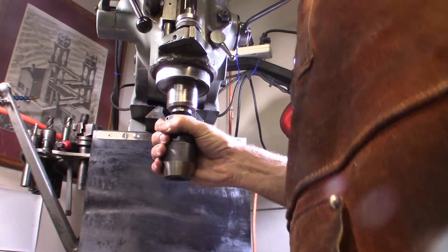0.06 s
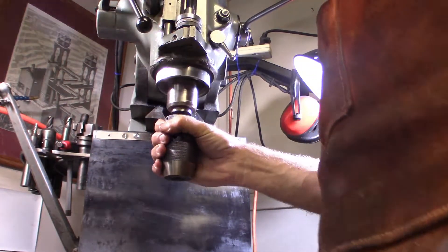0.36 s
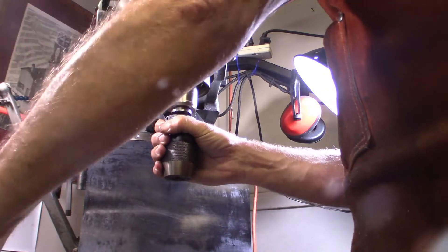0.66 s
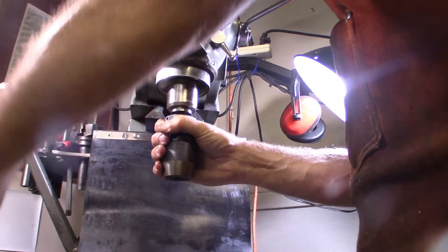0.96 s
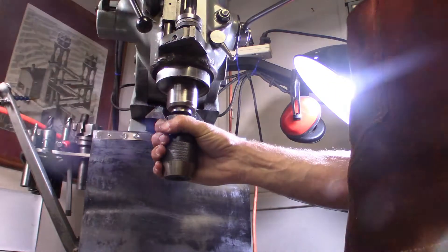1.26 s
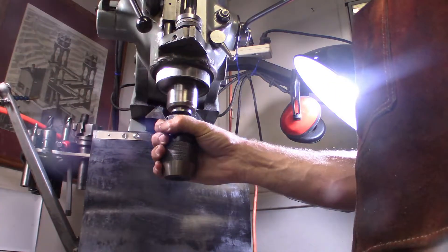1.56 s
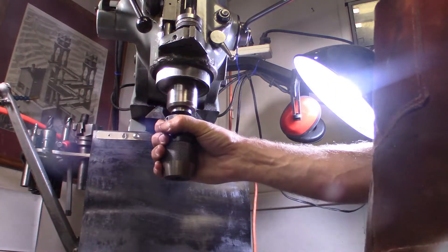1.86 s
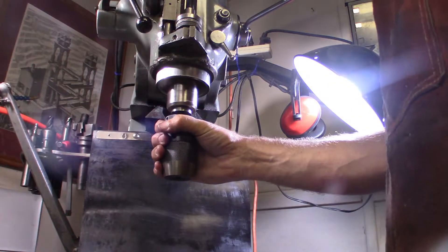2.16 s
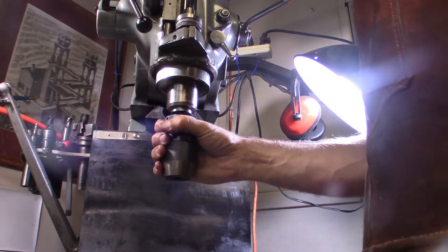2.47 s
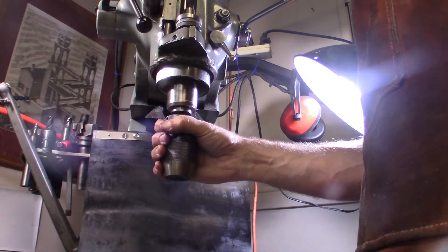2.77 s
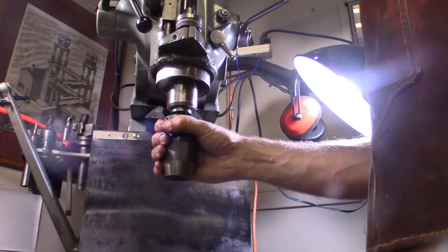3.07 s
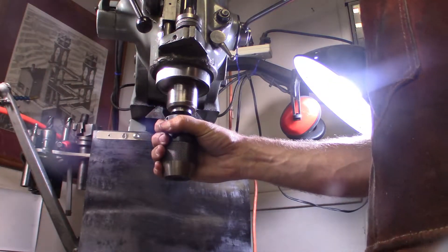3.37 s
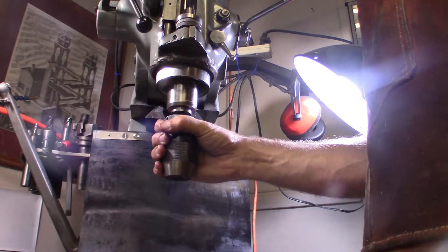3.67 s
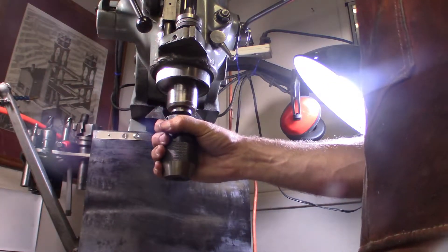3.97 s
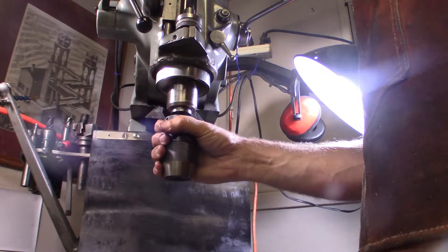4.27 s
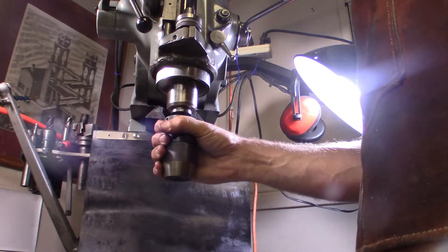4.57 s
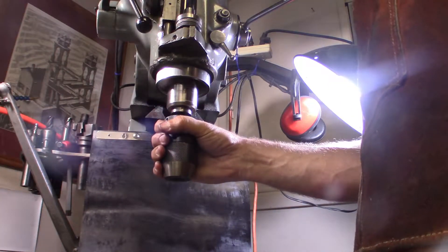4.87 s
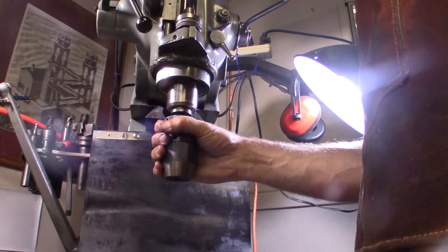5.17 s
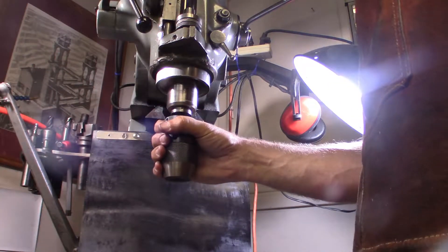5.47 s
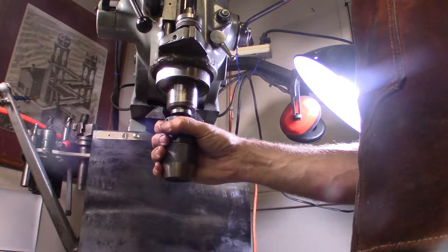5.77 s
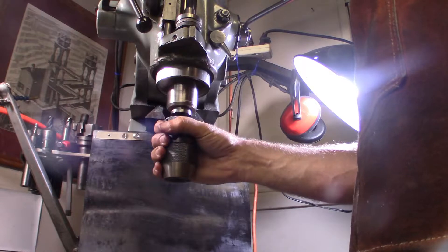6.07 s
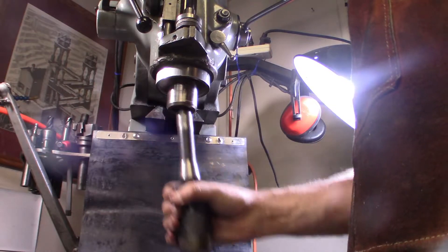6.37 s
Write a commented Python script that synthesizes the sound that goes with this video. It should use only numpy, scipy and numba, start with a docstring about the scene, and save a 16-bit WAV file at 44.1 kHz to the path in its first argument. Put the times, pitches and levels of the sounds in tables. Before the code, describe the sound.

Nine sharp, ringing hammer blows on a milling machine's steel drawbar in a small workshop, then the loosened chuck shank clinks.

```python
"""A small, hard-walled workshop: a drill chuck is knocked loose from a milling machine spindle.
Over low rumble, handling knocks and slides; a hollow tool is picked up with a bump and a scrape.
Nine hammer blows on the drawbar ring the machine head, with a faint squeak before the eighth.
The freed shank clinks against the bore. Gain control flattens every blow into the room's tail."""
import sys
import numpy as np
from scipy import signal
from scipy.fft import rfft, irfft
from scipy.io import wavfile
from scipy.ndimage import uniform_filter1d, minimum_filter1d
from numba import njit

SR = 44100
rng = np.random.default_rng(int(sys.argv[2]) if len(sys.argv) > 2 else 0)


def put_to_file(sound):
    """Save the sound as 16-bit audio at rate SR, in the file named by the first command-line argument."""
    columns = np.atleast_2d(sound).T  # one column per channel
    safe = np.clip(columns, -1, 1)
    whole_steps = np.round(safe * 32767)
    wavfile.write(sys.argv[1], SR, whole_steps.astype(np.int16))


N = 287973
T = np.arange(N) / SR
RING_T = T[:SR]  # 1 s axis for one impact


def undb(db):
    """Decibels to gain."""
    return 10 ** (np.asarray(db) / 20)


def lookup(points, hz):
    """Interpolate (f/Hz, value) points over log frequency."""
    f, value = np.transpose(points)
    return np.interp(np.log(hz), np.log(f), value)


def unit(x):
    """Scale to rms 1."""
    return x / np.std(x)


def add(out, start_s, x):
    """Mix x into out at start_s."""
    i = int(start_s * SR)
    out[i:i + len(x)] += x[:N - i]


def colour(x, db_at, size=4096):
    """Minimum-phase filter with gain db_at(hz)."""
    hz = np.maximum(np.arange(size // 2 + 1) * SR / size, 1)
    cepstrum = irfft(np.log(undb(db_at(hz))))
    cepstrum[1:size // 2] *= 2
    cepstrum[size // 2 + 1:] = 0
    impulse_response = irfft(np.exp(rfft(cepstrum)))
    return signal.fftconvolve(x, impulse_response)[:len(x)]


def band(x, hz, width_hz):
    """One resonance, unity gain at centre."""
    return signal.lfilter(*signal.iirpeak(hz, hz / width_hz, fs=SR), x)


def noise_bands(bands, noise):
    """Noise through steep resonances, compensated for bandwidth."""
    return sum(undb(db) * np.sqrt(SR / width_hz) * band(band(noise, hz, width_hz), hz, width_hz)
               for hz, width_hz, db in bands)


def fade(t60_s):
    """Exponential decay."""
    return np.exp(-np.log(1000) * RING_T / t60_s)


def burst(t60_s):
    """Decaying noise: the dense modes of a struck part."""
    return rng.standard_normal(len(RING_T)) * fade(t60_s)


def ring(modes):
    """Decaying modes, weighted differently by each contact."""
    offsets_db = 1.5 * rng.standard_normal(len(modes))
    return sum(undb(db + offset_db) * fade(t60_s) * np.sin(2 * np.pi * hz * RING_T)
               for (hz, db, t60_s), offset_db in zip(modes, offsets_db))


def stroke(start_s, length_s, attack_s, release_s):
    """Pressure of one rub: smooth rise, hold, decay."""
    rise = np.sin(np.pi / 2 * np.clip((T - start_s) / attack_s, 0, 1)) ** 2
    return rise * np.exp(-np.maximum(T - start_s - length_s, 0) / release_s)


def friction(pressure, spectrum, tilt_db_oct=0, pivot_hz=1000, catch_db=0.5):
    """Sliding noise that catches and slips every few milliseconds."""
    grip = undb(catch_db * unit(uniform_filter1d(rng.standard_normal(N), size=130)))
    noise = grip * rng.standard_normal(N)
    rub = colour(noise, lambda hz: lookup(spectrum, hz) + tilt_db_oct * np.log2(1 + hz / pivot_hz))
    return pressure * unit(rub)


# Room decay: f/Hz, t60/s
ROOM_DECAY = [(100, 0.66), (400, 0.43), (1000, 0.51), (2700, .53), (5500, 0.5), (9000, 0.29), (15000, 0.27)]


def room(x, wet_db, build_s=0.0024, bands=14):
    """Direct sound plus dense wall reflections; treble dies first."""
    centres_hz = np.geomspace(100, 15000, bands)
    spectrum = rfft(rng.standard_normal(len(RING_T)))
    bin_hz = np.arange(len(spectrum)) + 1
    band_index = np.interp(np.log(bin_hz), np.log(centres_hz), np.arange(bands))
    tail = np.zeros(len(RING_T))
    for k, hz in enumerate(centres_hz):
        triangle = np.maximum(1 - abs(band_index - k), 0)
        tail += irfft(spectrum * triangle, len(RING_T)) * fade(lookup(ROOM_DECAY, hz))
    tail *= 1 - np.exp(-RING_T / build_s)
    return x + undb(wet_db) * signal.fftconvolve(x, tail / np.linalg.norm(tail))[:len(x)]


# Background spectrum: f/Hz, relative level/dB
AIR_SPECTRUM = [(12, -33), (20, 3.5), (54, 6), (80, -1.5), (151, -13.5), (217, -16), (620, -21.5),
                (713, -14), (774, -20.5), (966, -21.5), (1680, -32.5), (2690, -27), (3650, -34.5),
                (8860, -41), (15000, -49)]


def air(noise_db=-40.5, hum_db=-63.0, mains_hz=60):
    """Shop rumble, faint hiss and mains hum."""
    bin_hz = np.maximum(np.arange(N + 1) * SR / (2 * N), 1)
    spectrum = rfft(rng.standard_normal(2 * N)) * undb(lookup(AIR_SPECTRUM, bin_hz))
    hum = np.sin(2 * np.pi * mains_hz * T)
    return undb(noise_db) * unit(irfft(spectrum)[:N]) + undb(hum_db) * hum


# Tool, sleeve and apron slides: t/s, length/s, relative level/dB, treble tilt/(dB/oct)
HANDLING_SLIDES = [(0.145, .2, -48.5, -2), (0.41, 0.069, -41.5, -25), (0.464, 0.06, -44, 0),
                   (0.606, 0.049, -41, 0.5), (0.655, .1, -46.5, -2), (0.848, 0.043, -44.5, -27),
                   (1.194, 0.026, -42.5, 1), (2.068, 0.097, -37, -8.5), (2.164, 0.066, -33.5, 1),
                   (2.29, 0.056, -20.5, 2)]
# Sliding spectrum: f/Hz, relative level/dB
SLIDE_SPECTRUM = [(100, -28), (300, -7), (450, 2.5), (750, -3.5), (1000, 5), (1400, -7), (2000, -2.5),
                  (2650, 5), (3700, -7), (5500, -7), (10000, -17.5), (15000, -67)]
# Light knocks: t/s, relative level/dB, f/Hz, width/Hz
HANDLING_KNOCKS = [(.148, -35.5, 735, 1630), (.365, -31.5, 980, 1810), (.478, -34.5, 240, 315),
                   (.53, -34, 1070, 2390), (1.204, -38, 2730, 500), (1.609, -26, 690, 800),
                   (1.722, -30, 680, 910), (2.031, -43, 1800, 2900), (2.08, -36, 850, 596)]


def handling(knock_db=-13, slide_db=-3):
    """Light knocks, and swishes that swell for the length of each slide."""
    out = np.zeros(N)
    for start_s, length_s, db, tilt_db_oct in HANDLING_SLIDES:
        pressure = stroke(start_s, length_s, attack_s=length_s, release_s=0.011)
        out += undb(db + slide_db) * friction(pressure, SLIDE_SPECTRUM, tilt_db_oct)
    for start_s, db, hz, width_hz in HANDLING_KNOCKS:
        knock = band(band(burst(t60_s=0.032), hz, width_hz), hz, width_hz)
        add(out, start_s, undb(db + knock_db) * unit(knock[:SR // 10]))
    return room(out, wet_db=-1.75)


# Drag spectrum: f/Hz, relative level/dB
DRAG_SPECTRUM = [(80, -55), (200, -23), (340, 4), (500, 5.5), (700, -1), (1010, 1.5), (1300, -17.5),
                 (1540, -2), (1850, -11), (2600, -2.5), (3800, -14.5), (6000, -18), (10500, -24),
                 (15500, -54)]
# Hollow tool modes: f/Hz, relative level/dB, t60/s
TOOL_MODES = [(378, -13, 0.081), (509, 2.5, 0.035), (610, -30, 0.026), (1040, -28, .08), (1520, -31, .15)]


def hollow_tool(start_s=1.3812, bump_db=13, drag_db=-16.5, breakaway_boost_db=13, low_cut_hz=300):
    """The tool bumps, breaks free with a bright rasp and drags; too small to radiate bass."""
    edges = dict(attack_s=0.0088, release_s=0.014)
    drag = friction(stroke(start_s, length_s=0.1, **edges), DRAG_SPECTRUM)
    breakaway = friction(stroke(start_s, length_s=0.021, **edges), DRAG_SPECTRUM, tilt_db_oct=3.5)
    out = room(undb(drag_db) * (drag + undb(breakaway_boost_db) * breakaway), wet_db=0)
    add(out, start_s, undb(bump_db) * room(ring(TOOL_MODES), wet_db=-4.0))
    return signal.sosfilt(signal.butter(2, low_cut_hz, "high", fs=SR, output="sos"), out)


def ripple_db(hz, points=70):
    """Random spectral ripple: each blow favours different resonances."""
    knots_hz = np.geomspace(200, 14000, points)
    return 2.8 * np.interp(np.log(hz), np.log(knots_hz), rng.standard_normal(points))


# Head clack spectrum: f/Hz, relative level/dB
CLACK_SPECTRUM = [(60, -7), (170, -5), (270, -7.5), (370, -0.5), (540, -2), (720, 0.5), (900, -6),
                  (1200, 0), (1650, -5.5), (2850, -3.5), (3400, -15.5), (5800, -26), (7600, -34),
                  (15000, -61.5)]
# Head and spindle modes: f/Hz, relative level/dB, t60/s
HEAD_MODES = [(373.5, -3.5, 0.75), (391, -1.5, 0.35), (437, -14, 1), (504, 1.5, 0.5), (677, -6.5, 0.76),
              (674, -7.5, 1), (731, -3.5, 0.87), (757, -5.5, 0.44), (844, -24, 0.41), (1070, 3.5, 0.5),
              (1172, -1.5, 0.52), (1384, -26, .55), (1876, 2.5, 0.37), (2082, 9.5, 0.16), (2580, 3, 0.37),
              (2694, 8, 0.31), (3120, -10, 0.44), (2770, -10.5, 0.76), (3680, -12, 0.34),
              (5120, -11.5, 0.28)]


def machine_head(clack_db=29.0, modes_db=-19.0):
    """One push and a slight rattle; the clack arrives mostly off the walls, the modes ring on."""
    push = (RING_T == 0) + undb(-39.5) * burst(t60_s=0.14)
    clack = colour(push, lambda hz: lookup(CLACK_SPECTRUM, hz) + ripple_db(hz))
    out = undb(clack_db) * room(clack, wet_db=9.43)
    return out + undb(modes_db) * room(ring(HEAD_MODES), wet_db=-13.5)


# Steel drawbar overtones: f/Hz, width/Hz, relative level/dB
DRAWBAR_BANDS = [(4060, 350, -4), (5430, 660, -4), (6190, 290, -16)]


def drawbar(blow_s, gain_db=-22, loose_s=5.6, loose_boost_db=4):
    """Bright steel overtones, louder once the taper lets go."""
    gain = undb(gain_db + loose_boost_db * (blow_s > loose_s))
    return gain * noise_bands(DRAWBAR_BANDS, burst(t60_s=0.43))


def contact_crack(gain_db=10):
    """Brief treble crack of the hammer landing."""
    core = band(band(burst(t60_s=0.017), 5200, 3100), 5650, 3100)
    skirt = band(burst(t60_s=0.012), 5500, 5300)
    return undb(gain_db) * (core + undb(-20.5) * skirt)


# Hammer face mode clusters: f/Hz, width/Hz, relative level/dB
FACE_BANDS = [(8850, 2900, -6), (11770, 160, -13.5), (12200, 140, -17.5), (12550, 160, -14)]


def hammer_face(blow_s, gain_db=-12, peak_s=5.06, falloff_db_per_s=6):
    """The hard face rings very high, most around blows six and seven."""
    gain = undb(gain_db - falloff_db_per_s * abs(blow_s - peak_s))
    return gain * noise_bands(FACE_BANDS, burst(t60_s=0.057))


# Blows: t/s, force/dB, treble tilt/(dB/oct), bass thud/dB, mid clonk/dB, ping f/Hz
HAMMER_BLOWS = [(2.7289, -1.5, 1, -0.5, 14, 1050), (3.1711, -13, 1.5, 8, 6.5, 2480),
                (3.6535, -6, 4, 1, 5, 1860), (4.0788, -4.5, 1.5, 0, 7, 2490),
                (4.497, -8, 3, -2.5, 6.5, 2270), (4.919, -7, 0, 6, 9.5, 2730),
                (5.3625, -8.5, 3, 3, 8, 1760), (5.8068, -6.5, 2.5, -2, 5, 2450),
                (6.2572, -0.5, 2.5, -3.5, 1.5, 2320)]


def hammer(tilt_hz=1400, thud_hz=420, clonk_hz=900):
    """Each blow cracks, pings the drawbar and rings the head and hammer face."""
    out = np.zeros(N)
    for blow_s, force_db, tilt_db_oct, thud_db, clonk_db, ping_hz in HAMMER_BLOWS:
        body = machine_head() + drawbar(blow_s)
        # square hit: bright; glancing hit: dull, hollow
        body = colour(body, lambda hz: tilt_db_oct * np.log2(1 + (hz / tilt_hz) ** 2) / 2)
        body = colour(body, lambda hz: thud_db / (1 + (hz / thud_hz) ** 4)
                      + clonk_db * np.exp(-2 * np.log2(hz / clonk_hz) ** 2))
        # drawbar springs under the hammer: f/Hz, relative level/dB, t60/s
        ping = ring([(ping_hz, 18, 0.012), (2750, 8, 0.02)])
        crack = contact_crack()
        face = hammer_face(blow_s)
        blow = body + crack + room(ping, wet_db=-22.0) + room(face, wet_db=-4)
        add(out, blow_s, undb(force_db) * blow)
    return out


# Squeak resonances: f/Hz, width/Hz, relative level/dB
SQUEAK_BANDS = [(4110, 390, 1), (8200, 930, -17.5)]


def squeak(gain_db=-41):
    """A thin squeal and its octave swell and fade."""
    envelope = stroke(start_s=5.56, length_s=0.16, attack_s=0.089, release_s=0.096)
    return undb(gain_db) * envelope * noise_bands(SQUEAK_BANDS, rng.standard_normal(N))


# Shank modes: f/Hz, relative level/dB, t60/s
SHANK_MODES = [(2100, -2, 0.065), (2263, -2.5, 0.065), (2590, -2.5, 0.066), (3800, -10, 0.034),
               (5150, -9.5, 0.033), (5750, -19, .03), (8250, -16.5, 0.039), (9100, -28.5, .03)]


def shank(start_s=6.4405, gain_db=-7):
    """The loose taper clinks against the bore."""
    out = np.zeros(N)
    clink = ring(SHANK_MODES)
    contact = undb(12) * band(band(burst(t60_s=0.039), 1800, 2000), 1800, 1900)
    add(out, start_s, undb(gain_db) * room(clink + contact, wet_db=-5.5))
    return out


def scene():
    """Mono sum of all sources."""
    return (hammer() + shank() + hollow_tool() + handling() + squeak() + air())[None]


@njit
def follow(x, attack_s, release_s):
    """Envelope follower with separate rise and fall times."""
    out, level = np.empty(len(x)), 0.
    up = 1 - np.exp(-1 / (attack_s * SR))
    down = 1 - np.exp(-1 / (release_s * SR))
    for i in range(len(x)):
        level += (abs(x[i]) - level) * (up if abs(x[i]) > level else down)
        out[i] = level
    return out


def record(dry, threshold_db=-8.0, lookahead_samples=41, top_hz=15800):
    """Gain control rides the blows, a look-ahead limiter catches their onsets, then a steep low-pass."""
    x = dry[0]
    envelope = follow(x, attack_s=0.0051, release_s=0.024)
    x = x / np.maximum(envelope / undb(threshold_db), 1)
    safe_gain = 1 / np.maximum(abs(x), 1)
    held_gain = minimum_filter1d(safe_gain, size=lookahead_samples)
    x = x * uniform_filter1d(held_gain, size=lookahead_samples)
    return signal.sosfilt(signal.ellip(8, .2, 70, top_hz, fs=SR, output="sos"), x)[None]


dry = scene()
out = record(dry)
put_to_file(out)
```